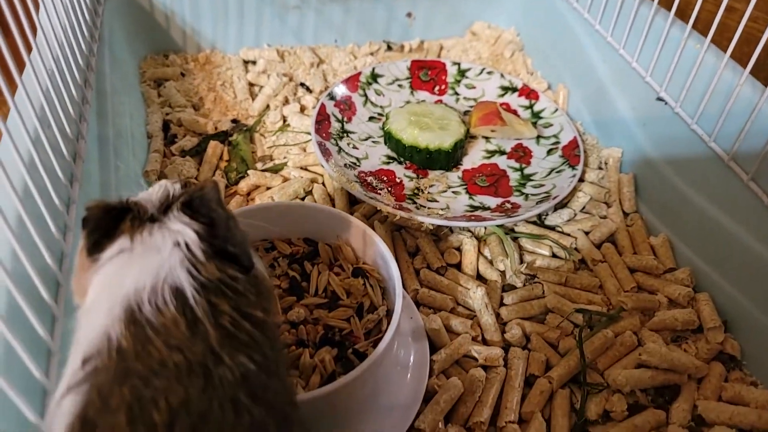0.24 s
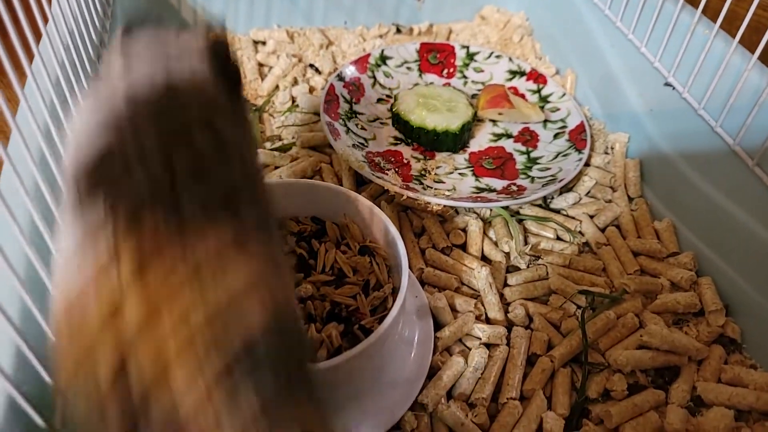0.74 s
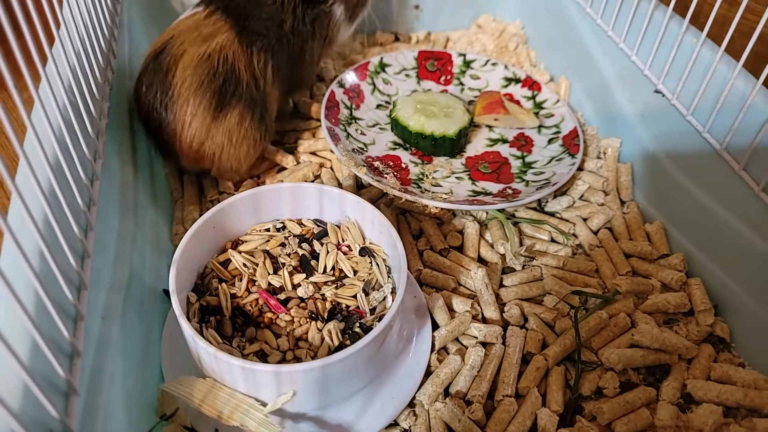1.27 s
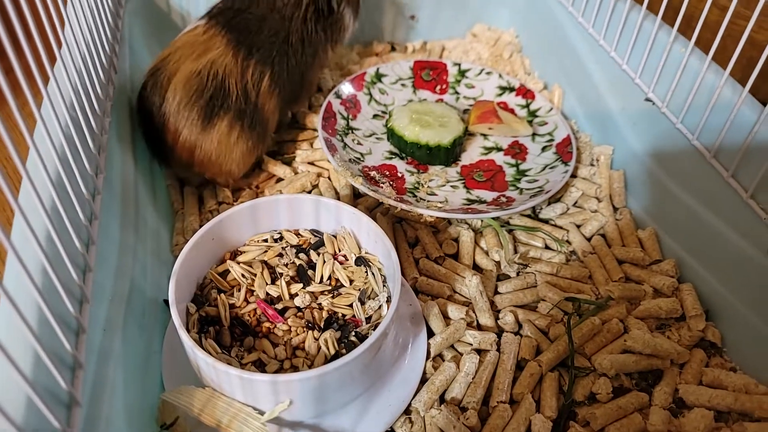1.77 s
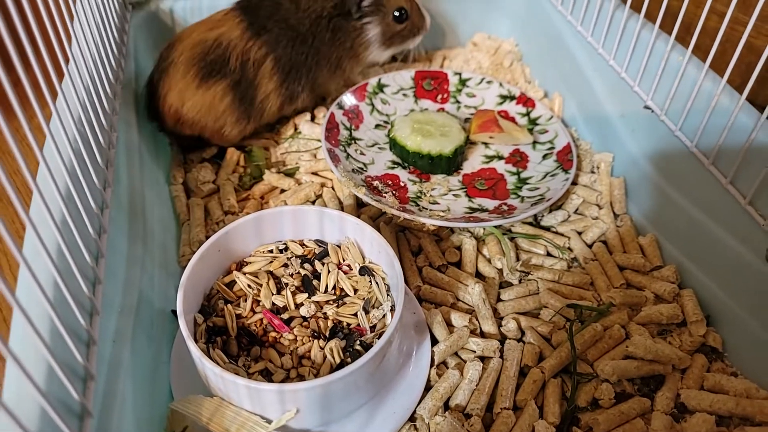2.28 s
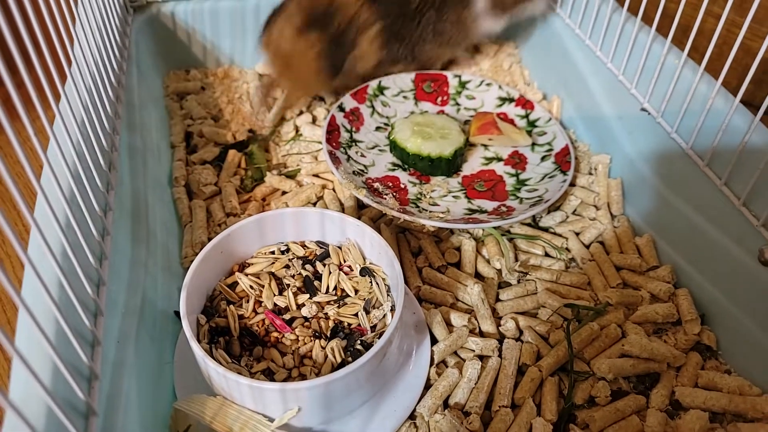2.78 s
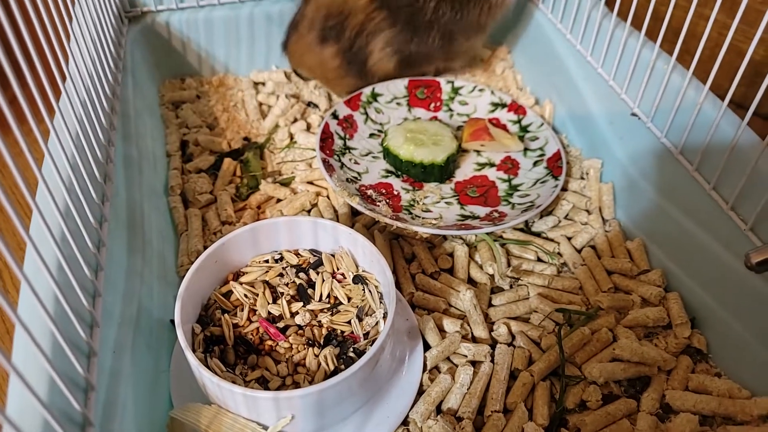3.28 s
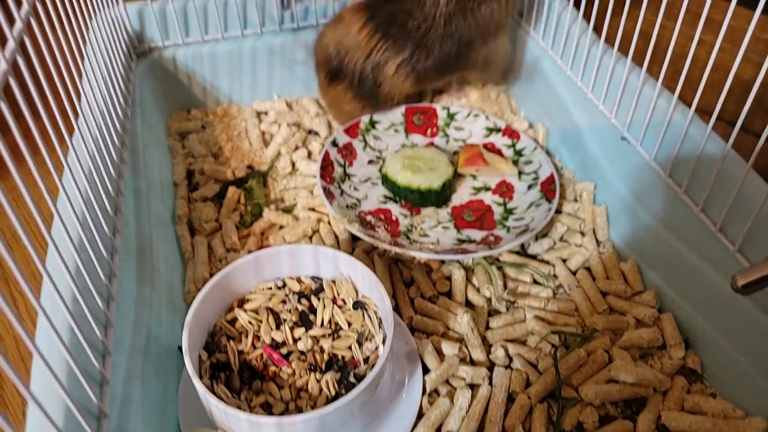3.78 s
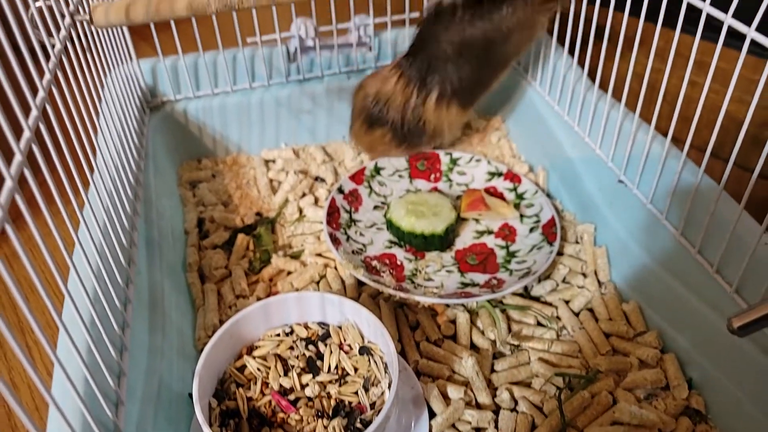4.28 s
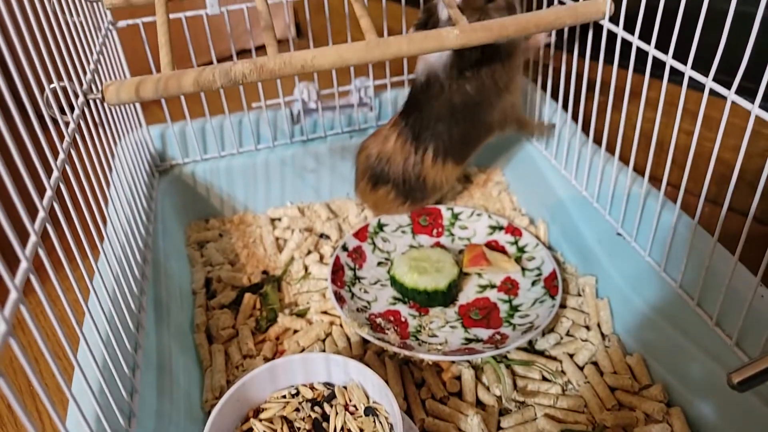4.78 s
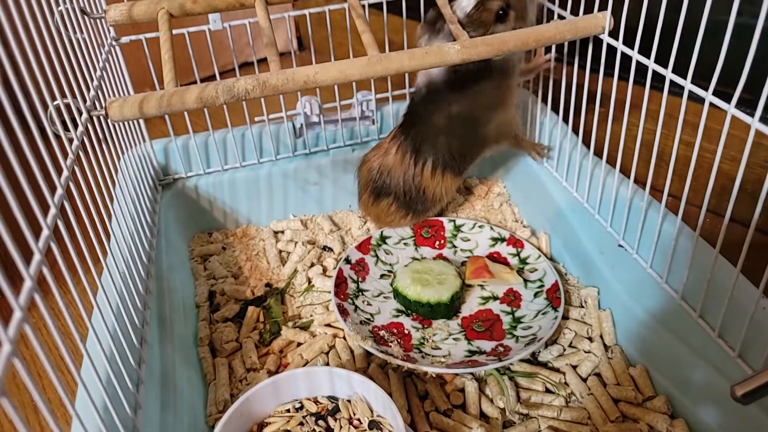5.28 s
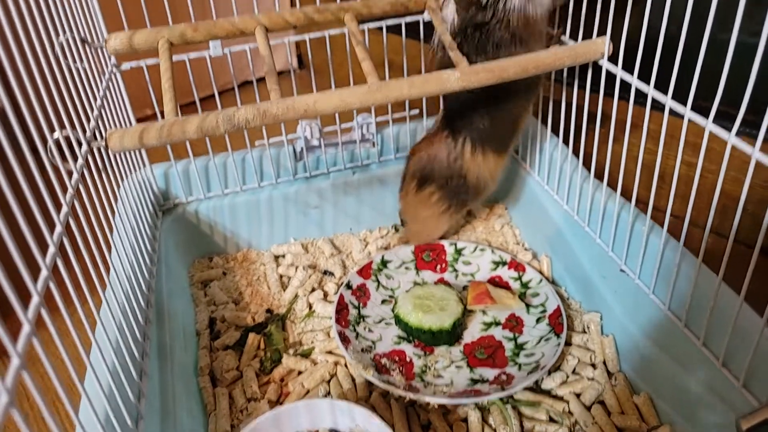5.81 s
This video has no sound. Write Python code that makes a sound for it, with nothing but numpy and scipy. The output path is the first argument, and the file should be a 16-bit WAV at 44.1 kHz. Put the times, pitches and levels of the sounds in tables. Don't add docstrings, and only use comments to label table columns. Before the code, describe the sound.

In a quiet room, a small rodent chirps short upturned squeaks, knocks a bowl sharply, thumps down on its tray, then scrabbles softly at wire bars.

```python
import sys
import numpy as np
from scipy import signal
from scipy.fft import rfft, irfft, next_fast_len
from scipy.io import wavfile

SR = 44100
rng = np.random.default_rng(int(sys.argv[2]) if len(sys.argv) > 2 else 0)


def dump(signal):
    limited = np.clip(np.atleast_2d(signal).T, -1, 1)
    pcm = np.round(limited * 32767).astype(np.int16)
    wavfile.write(sys.argv[1], SR, pcm)


def nominal_scale(level):
    x = np.asarray(level, float) / 20
    return 10 ** x


N = 266805


def squeaks():
    # start in s, length in s, held pitch in Hz, peak level in dB, share of the length at the peak (0-1).
    calls = [(0.972, .054, 783.7, -33, 0.6), (1.062, 0.017, 831, -40.5, 0.42),
             (1.17, 0.068, 736.6, -32.5, 0.44), (1.542, 0.062, 723.5, -35.5, 1),
             (2.111, 0.053, 709.7, -32, 0.38), (2.572, 0.033, 716, -40.5, 0.26),
             (2.758, 0.067, 723.7, -38, 0.4), (2.968, 0.056, 706.3, -41.5, 0.59),
             (3.317, 0.055, 724.4, -44, 0.49), (3.882, 0.0397, 714, -44, 0.35),
             (4.462, 0.04, 778, -50, 0.35), (4.916, 0.048, 740.5, -45, 0.4), (5.539, 0.047, 759, -45, 0.41),
             (0.464, 0.032, 789, -44.5, 1)]
    # start above held pitch in Hz, final flick in Hz, its time before the end in s,
    # drop of the fundamental there in dB.
    glides = [(196.5, 167, .012, 5.5), (25, 17.5, 0.0031, 5), (30.5, 168.5, 0.0083, 1),
              (-20, 115.5, 0.007, 10), (94.5, 258, 0.008, 4.5), (14.5, 195, .009, 1), (42.5, 167, .015, 9),
              (18, 97.5, 0.006, 5), (47.5, 226, 0.0089, 8), (332, 42, .003, 2), (-20.5, 21, 0.0045, 7),
              (103.5, 193, 0.0086, 16.5), (113, 190.5, .009, 18), (130, -150, .009, -3.5)]
    # middle after the start in s, half length in s.
    skips = [(0.019, 0.0051), (0.0092, 0.0065), (0.0129, 0.00773), (.021, 0.0098), (.012, .006),
             (0.0056, 0.0055), (0.015, 0.0035), (.005, .005), (0.015, 0.0074), (0.017, 0.017),
             (0.0097, 0.0073), (0.019, 0.0051), (0.029, 0.0042), (0.011, .003)]
    # left later in samples, overtones left-right in dB, overtones left later in samples.
    head = [(-3, -4, -10), (-1, -3, 4), (-2, -3, -1), (-1, -5, 0), (-2, 1, 2), (-2, 3, 4), (-4, 3, 15),
            (0, 2.5, 18), (-4, -3, 18), (-14, -3, -6), (-4, -5, -4), (-4, -2.5, -2), (-7, 2, -2),
            (-10, 2, -12)]
    # skipped-cycle line in dB, 2nd harmonic in dB,
    # 3rd harmonic in dB, lines half-way between harmonics in dB.
    colour = [(-40, -14, -25.5, -41.5), (-15.5, -16, -17.5, -37), (-14.5, -13, -45, -39.5),
              (-18, -16, -40, -39.5), (-26, -15, -45.5, -51), (-19.5, -14.5, -58, -37),
              (-34.5, -11, -29, -39), (-17.5, -12, -32, -39), (-13.5, -10, -34.5, -41),
              (-17.5, -8.5, -29, -25), (-25.5, -15.5, -47.5, -18), (-41, -10, -28.5, -38),
              (-38.5, -9, -22.5, -39.5), (-17, -12, -19, -34.5)]
    roughness = [.25, .25, .09, .3, .08, .24, .26, .1, .13, .32, .12, .13, .16, .12]
    harmonic_falls = [5.4, 4.9, 4, 6.1, 3.2, 5, 4.5, 7.1, 4, 11, 9, 12, 10, 6.4]
    # rise of effort to the peak in dB, sag after it in dB.
    effort = [(4.5, 6.5), (7, 10), (9, 8), (9, 8), (10.5, 7.5), (5, 4.5), (6.5, 8.5), (7, 2), (7.5, 5),
              (3, 6), (7.5, 4.5), (7, 8.5), (8.5, 7), (9.5, 1.5)]
    settle_share, flick_s, collapse_s = 0.29, 0.0041, 0.0015
    open_s, close_s, overtone_growth, overtone_late_s = 0.0041, 0.0028, 1.5, 0.007
    wobble_share, skip_ratio, skip_rise_per_s = 0.03, 1.55, 5.2
    out = np.zeros((2, N))
    for call, glide, skip, turn, tone, rough, fall_db, (swell_db, sag_db) in zip(
            calls, glides, skips, head, colour, roughness, harmonic_falls, effort):
        s, length, held_hz, peak_db, crest = call
        start_hz, flick_hz, tail_s, loss_db = glide
        skip_s, half_s = skip
        late, over_db, over_late = turn
        skip_db, second_db, third_db, half_db = tone
        t = np.arange(0, length, 1 / SR)
        from_tail = t - length + tail_s

        crest = np.clip(crest, .1, .9)
        rise_db = swell_db * (1 - t / length / crest)
        decline_db = sag_db * (t / length - crest) / (1 - crest)
        effort_db = -np.maximum(rise_db, decline_db)
        broken_db = loss_db * .5 * (1 + np.tanh(from_tail / collapse_s))
        fundamental = nominal_scale(peak_db + effort_db - broken_db)
        bright = nominal_scale(overtone_growth * effort_db + peak_db - 0.44 * broken_db)
        bright *= np.clip(np.minimum(t, length - t) / overtone_late_s, 0, 1)

        noise = rng.standard_normal((4, int(.1 * SR)))[:, :len(t)]
        shimmer, jitter = 7 * filtered(noise[:2], 4, 450)
        hz = held_hz + start_hz * np.exp(-t / (settle_share * length))
        hz = hz + flick_hz * .5 * (1 + np.tanh(from_tail / flick_s))
        hz = hz * (1 + wobble_share * rough * 18 * filtered(noise[1, ::-1], 2, 70))
        skipping = np.exp(-((t - skip_s) / half_s) ** 4)
        unsteady = rough * (.4 + .6 * skipping)
        phase = 2 * np.pi * np.cumsum(hz) / SR + unsteady * jitter

        robbed = np.clip(0.87 * nominal_scale(skip_db + 12.5), 0, .8) * skipping
        voice = bright * nominal_scale(second_db) * (1 - robbed) * np.sin(2 * phase + 1)
        third, *upper = [bright * nominal_scale(third_db - fall_db * k) * np.sin((3 + k) * phase + k) for k in range(4)]
        voice += third
        voice += bright * nominal_scale(half_db) * (np.sin(1.5 * phase) + np.sin(2.5 * phase))
        airflow = rms_one(filtered(noise[3], 3, [1000, 2500], "band"))
        voice += rough * nominal_scale(20 * np.log10(fundamental) - 26) * airflow

        skip_hz = held_hz * (skip_ratio + skip_rise_per_s * (t - skip_s))
        skip_phase = 2 * np.pi * np.cumsum(skip_hz) / SR + 2 * rough * shimmer
        low = fundamental * (np.sin(phase) + nominal_scale(skip_db + 4.0) * skipping * np.sin(skip_phase))

        gate = np.clip(np.minimum(t / open_s, (length - t) / close_s), 0, 1)
        shape = np.sqrt(2) * (1 + shimmer * unsteady) * gate
        add(out, s, lagged(low * shape, 0, late))
        add(out, s, lagged(sum(upper) * shape, over_db, late))
        add(out, s, lagged(voice * shape, over_db, over_late))
    return out


def knocks():
    # start in s, peak level in dB, ring in Hz, crack level in dB, t60 in s.
    blows = [(.770, -53.5, 790, -82, 0.096), (0.7877, -32.5, 1286, -23.5, 0.022),
             (0.7878, -30, 2170, -67, .015), (.790, -30, 745, -38, 0.031), (0.875, -54, 1230, -36, 0.02),
             (0.88, -48, 1000, -44, .02), (.9148, -34.5, 610, -48, 0.02), (0.9207, -20, 1100, -27, 0.0065),
             (0.9198, -26, 2226, -29.5, 0.01), (.9211, -30, 560, -39, 0.022), (0.925, -35, 1000, -46, .011),
             (3.371, -59, 752, -78.5, 0.079), (4.007, -44.5, 760, -58.5, .012),
             (1.007, -44, 1100, -35, 0.029), (1.065, -44, 855, -47.5, 0.021),
             (3.989, -38, 1100, -51, 0.022), (4.003, -56, 478, -32.5, 0.016),
             (4.003, -40.5, 700, -60, 0.02), (4.019, -52, 690, -44, 0.019),
             (4.0451, -45.5, 2460, -34.5, 0.02), (4.0447, -47.5, 1570, -72, 0.0032),
             (4.208, -61.5, 1850, -62.5, 0.062), (4.227, -46.5, 602, -58, 0.018),
             (4.239, -49.5, 690, -66.5, 0.019), (3.797, -48.5, 1200, -65, .012),
             (3.8665, -51.5, 1140, -65, 0.019), (.9255, -35, 920, -42, .012), (0.9304, -35, 897, -52, .012),
             (4.355, -63.5, 1633, -70, 0.054), (4.256, -64.5, 567.5, -62, 0.46),
             (4.432, -60, 590, -72, 0.12)]
    # start in s, peak level in dB, ring in Hz.
    taps = [(.4985, -44, 1052), (2.687, -51.5, 755), (2.726, -46, 760), (2.728, -53.5, 1483),
            (2.28, -62, 894), (3.256, -67, 1313), (3.377, -54, 1100), (2.694, -54, 757),
            (5.431, -55.5, 710), (5.728, -60, 1764), (4.257, -51, 620), (4.285, -57, 650),
            (4.298, -54.5, 697), (4.433, -51, 592), (3.784, -60.5, 743), (3.981, -44.5, 715),
            (4.191, -52.5, 753), (4.2095, -48, 770), (4.239, -49, 1133), (4.317, -49.5, 589),
            (4.87, -65.5, 1857), (4.404, -52, 596), (4.42, -48, 600), (4.54, -51, 660), (4.876, -53.5, 720),
            (5.376, -65, 1042), (5.445, -53.5, 631), (5.517, -44.5, 689), (5.671, -56, 715),
            (5.722, -54.5, 730)]
    # ratio to the ring frequency, level in dB.
    plastic = [(1, 4), (0.32, -16.5), (0.88, -11), (1.4, -8), (4.1, -8.5)]
    tap_crack_db, tap_t60_s = -20, 0.022
    scatter_db, scatter_samples = 2.5, 9
    out = np.zeros((2, N))
    t = np.arange(int(.12 * SR)) / SR
    soft = [(s, db, hz, db + tap_crack_db, tap_t60_s) for s, db, hz in taps]
    for s, peak_db, hz, crack_db, t60 in [*blows, *soft]:
        hard = nominal_scale(.5 * (peak_db + 19.0))
        body = 0
        for ratio, db in plastic:
            level, detune, pan, lag = rng.standard_normal(4)
            mode_hz = hz * ratio * (1 + detune / 25 * (ratio != 1))
            gain = nominal_scale(db + 2.5 * level) * hard ** (.5 * max(ratio - 1, 0))
            mode = gain * ring(mode_hz, t60 / ratio ** .6, .0004 / hard)
            body = body + lagged(mode, scatter_db * pan, scatter_samples * lag)[:, :len(t)]
        noise = rng.standard_normal((3, len(t)))
        noise[0, :2] = 6 * hard ** .4
        top_hz = np.clip(2000 + 6000 * hard, 1500, 12000)
        crack = (noise[0] + 0.31 * noise[1:]) * nominal_scale(-60 * t / 0.017)
        crack = filtered(crack, 3, [900, top_hz], "band")
        add(out, s, sided(nominal_scale(peak_db + 8.5) * body + nominal_scale(crack_db + 3.0) * crack, s))
    return out


def ticks():
    # start in s, peak level in dB.
    touches = [(.4224, -68), (.7808, -55), (.7876, -26), (.849, -48), (.857, -49), (.863, -42), (.897, -39),
               (.9194, -15), (.9744, -47), (.9944, -58), (1.064, -52), (1.0926, -48), (2.2368, -64),
               (3.784, -56), (3.8666, -70), (3.894, -70), (4.2072, -64), (4.2381, -57), (4.4075, -63),
               (4.54, -68), (5.4979, -65), (5.7593, -61), (5.8194, -67)]
    out = np.zeros((2, N))
    t = np.arange(int(.12 * SR)) / SR
    for s, peak_db in touches:
        pulse = rng.standard_normal((2, len(t))) * nominal_scale(-60 * t / .004)
        tick = resonance(np.diff(pulse), 9500, 7000)
        add(out, s, sided(nominal_scale(peak_db - 1.5) * tick, s))
    return out


def clacks():
    # start in s, peak level in dB, centre in Hz.
    strikes = [(0.7883, -26, 3000), (0.8004, -46, 5000), (2.727, -61.5, 1700), (3.7845, -60.5, 3500),
               (3.799, -61, 3500), (3.982, -51, 1800), (3.986, -49, 2000), (3.9908, -46.5, 3930),
               (4.0008, -44, 2400), (4.008, -42, 1500), (4.0217, -52, 4300), (4.0448, -43, 2780),
               (4.195, -63, 2500), (4.227, -58.5, 1900)]
    t60_s = .008
    out = np.zeros((2, N))
    t = np.arange(int(.12 * SR)) / SR
    for s, peak_db, hz in strikes:
        snap = rng.standard_normal(len(t)) + .5 * rng.standard_normal((2, len(t)))
        snap = snap * nominal_scale(-60 * t / t60_s)
        clack = resonance(resonance(snap, hz, 0.42 * hz), hz, 1.2 * hz)
        add(out, s, sided(nominal_scale(peak_db + 4.5) * clack, s))
    return out


def thuds():
    # start in s, peak level in dB, upper mode in Hz, t60 in s.
    landings = [(0.483, -67, 90, 0.059), (0.791, -60.5, 113, 0.12), (0.86, -60, 100, .08),
                (.92, -44, 132, 0.094), (0.957, -34, 145, 0.061), (0.99, -40.5, 138, 0.091),
                (1.156, -40.5, 140.5, 0.064), (1.189, -45, 160, 0.07), (1.222, -49.5, 125, 0.072),
                (1.293, -56, 153, 0.12), (1.425, -49, 154, 0.061), (3.992, -51.5, 171.6, 0.12),
                (4.004, -38.5, 180, 0.019), (4.077, -50.5, 172, 0.028), (5.726, -60, 143.3, 0.15),
                (5.766, -55.5, 150.7, 0.084)]
    out = np.zeros((2, N))
    for s, peak_db, hz, t60 in landings:
        boom = ring(hz, t60, 0.0022) + nominal_scale(-11.0) * ring(0.69 * hz, 1.4 * t60, 0.0036)
        add(out, s, nominal_scale(peak_db + 6.5) * np.array([nominal_scale(-2.0) * boom, np.roll(boom, 14)]))
    return out


def scrabble():
    # loudest moment in s, pellets shifting in dB, fur and claws brushing in dB, swell in s, die in s.
    shuffles = [(.002, -85, -72, 0.016, 0.13), (.48, -60, -67, 0.028, 0.13), (.524, -89, -87, 0.034, 0.47),
                (.793, -55, -56.5, 0.041, 0.23), (.9, -56, -53, 0.12, 0.019),
                (.97, -52.5, -54.5, 0.057, 0.18), (1.1, -66, -68.5, 0.26, 0.27),
                (2.24, -86, -80, 0.17, 0.2), (2.586, -84.5, -77, 0.067, 0.08),
                (3.785, -100, -77, .02, 0.42), (3.898, -75.5, -82.5, 0.18, 0.11),
                (3.98, -71, -67.5, 0.017, 0.11), (4.01, -60.5, -80, 0.072, 0.23),
                (4.206, -64, -80.5, 0.013, 0.04), (4.238, -60.5, -66, 0.0045, 0.11),
                (4.4, -75, -75, 0.084, 0.087), (4.45, -80, -85, 0.19, 0.095), (4.54, -78, -83, 0.13, 0.14),
                (4.84, -90, -83.5, 0.14, 0.64), (5.03, -79.5, -88, 0.25, .1),
                (5.376, -83, -93, 0.036, 0.63), (5.51, -92.5, -80, 0.29, 0.075),
                (5.724, -76, -81, 0.033, 0.21)]
    # loudest moment in s, level in dB, swell in s, die in s.
    tray_rumble = [
        (1.0, -63.5, 0.24, 2.6),
        (4.05, -65.5, 0.55, 0.72),
        (5.75, -72.5, 0.55, 0.47),
    ]
    # frequency in Hz, level in dB per Hz.
    pellet_spectrum = [(180, -37.5), (300, 0), (554, 4.5), (1150, 1), (1610, 2.5), (2070, -5), (3630, -22),
                       (6000, -27), (7800, -44), (13200, -120)]
    # frequency in Hz, level in dB per Hz.
    brush_spectrum = [(1470, -36), (2500, -18), (6550, -13.5), (8140, -6), (9510, -17), (14700, -18.5),
                      (16000, -22)]
    # centre in Hz, width in Hz, level in dB.
    bar_bands = [(3350, 450, -3), (5400, 800, 0), (8200, 800, -5), (11400, 800, -8), (13900, 800, -9)]
    bars_reached_s, bars_left_s = 4.15, 4.94
    shifting, brushing = bursts(shuffles)
    pellets = coloured(grains(5000, 3), pellet_spectrum, [(300, .8), (3000, .3)], 1.5)
    brush = coloured(grains(21000, 1.3), brush_spectrum, [(3000, 0.2), (9000, 0.0029)], 1.2)

    claws = grains(12000, 1.7)[0]
    bars = 0
    for hz, width, level_db in bar_bands:
        band = resonance(resonance(claws, hz, width), hz, 2 * width)
        bars = bars + nominal_scale(level_db + 2.9 * drift(23.3)) * band
    bars = rms_one(bars)
    t = np.arange(N) / SR
    climbing = (t > bars_reached_s) & (t < bars_left_s)
    brush = np.where(climbing, 1.57 * bars + 0.47 * brush, brush * nominal_scale([[1.5], [-1.5]]))
    brushing = brushing * nominal_scale(1.5 * drift(35))

    rumble = rng.standard_normal(N) + 0.52 * rng.standard_normal((2, N))
    rumble = rms_one(resonance(resonance(rumble, 91, 140), 180, 200))
    return nominal_scale(6.0) * shifting * pellets + nominal_scale(-4.5) * brushing * brush + bursts(tray_rumble) * rumble


def pluck():
    # mode in Hz, level in dB, t60 in s.
    bar_modes = [(2293, -10, 0.4), (4651, -3, 0.17), (6998, 0, 0.077), (9496, -8, 0.17), (12230, -13, 0.13),
                 (12480, -11, 0.066), (15290, -11, 0.053)]
    pluck_s, pluck_db, gripped_s = 3.9625, -57, 0.065
    out = np.zeros((2, N))
    wire = sum(nominal_scale(pluck_db + db) * ring(hz, t60, 0.00058) for hz, db, t60 in bar_modes)
    wire *= nominal_scale(-900 * np.maximum(np.arange(len(wire)) / SR - gripped_s, 0))
    add(out, pluck_s, wire * nominal_scale([[-1], [1]]))
    return out


def room(x):
    wall_echo_s, wall_echo_db, wall_cut_hz = 0.016, -21, 2800
    room_t60_s, treble_t60_s, room_db, build_s, low_hz = 0.65, 0.26, -44.5, 0.016, 1000
    cage_t60_s, cage_db = .1, -34
    scatter_per_s, steady_share = 130, 0.3
    t, size = np.arange(SR) / SR, next_fast_len(N + SR)
    noise = rng.standard_normal((2, SR))
    dull = filtered(noise, 1, wall_cut_hz)
    build = np.clip(t / build_s, 0, 1)
    tail = dull * nominal_scale(-60 * t / room_t60_s) + (noise - dull) * nominal_scale(-60 * t / treble_t60_s)
    tail = nominal_scale(room_db) * filtered(tail * build ** 2, 2, low_hz, "high")
    tail += nominal_scale(cage_db - 60 * t / cage_t60_s) * dull[::-1] * build
    echo = np.zeros((2, SR))
    echo[[0, 1], (wall_echo_s * SR * np.array([1, 1.03])).astype(int)] += nominal_scale(wall_echo_db)
    echo = filtered(echo + 1e-18, 1, wall_cut_hz)
    scattered = x * (steady_share + drift(scatter_per_s))
    wet = rfft(tail, size) * rfft(scattered, size) + rfft(echo, size) * rfft(x, size)
    return irfft(wet, size)[:, :N]


def background():
    # frequency in Hz, level in dB per Hz.
    quiet = [(15, -49), (25, -20), (114, -11.5), (265, -13), (296, -8), (448, -20.5), (530, -2.5),
             (615, -14.5), (715, 1.5), (785, -9.5), (912, -16.5), (1210, -27), (2200, -35.5), (2860, -64),
             (4840, -120)]
    # frequency in Hz, left-right likeness (clipped to -1..1).
    likeness_curve = [(60, 0.92), (240, 0.95), (950, -0.41), (3770, -1.1), (15000, 0.19)]
    # frequency in Hz, level in dB per Hz.
    hiss_spectrum = [(1300, -2.5), (2200, -0.5), (3500, -4), (6000, -5.5), (9000, -4.5), (13000, -2),
                     (16500, -3)]
    # centre in Hz, width in Hz, level in dB.
    motor_lines = [(128, 1.2, -80.5), (184.7, 4.2, -84), (301.7, 21, -78.5), (357.8, 6.1, -78.5),
                   (525, 19, -79.5), (556, 1.9, -81.5), (730.6, 4.6, -74), (918, 6, -82), (2800, 18, -101)]
    quiet_db, hiss_db = -65.5, -89.5
    air = nominal_scale(quiet_db - 2.5) * coloured(rng.standard_normal((2, 2, N)), quiet, likeness_curve, 0.58)
    hiss = coloured(rng.standard_normal((2, 2, N)), hiss_spectrum, [(1000, 0), (9000, 0)], .3)
    white = rng.standard_normal((3, N))
    motor = white[0] + .5 * white[1:]
    hum = sum(nominal_scale(db) * rms_one(resonance(resonance(motor, hz, w), hz, w)) for hz, w, db in motor_lines)
    return air + nominal_scale(hiss_db + 3) * hiss + hum


def sided(x, s):
    # time in s, bright part left-right in dB, body left-right in dB, left later in samples.
    contact_side = [(.47, 12, 1, -17), (0.791, 12, -2, -12), (0.92, 4, 4.5, -10.5), (1.06, 8, -3.5, -1),
                    (2.72, 3, -1, 0.5), (3.9, 2.5, 1.5, -5), (4.02, 0.5, 2, -2.5), (4.21, 7, -0.5, -9.5),
                    (4.24, 2, 4, 4.5), (5.5, 0, 1, -1), (6, -5, 1, 4)]
    times, *columns = np.transpose(contact_side)
    bright_db, body_db, late = [np.interp(s, times, c) for c in columns]
    bass = signal.lfilter([.4], [1, -.6], x)
    return lagged(bass, body_db, late) + lagged(x - bass, bright_db, late)


def lagged(x, pan_db, late):
    late = round(np.clip(late, -30, 30))
    x = np.broadcast_to(x, (2, x.shape[-1])) * nominal_scale(pan_db * np.array([[.5], [-.5]]))
    delays = [max(late, 0), max(-late, 0)]
    return np.array([np.pad(side, (d, 30 - d)) for d, side in zip(delays, x)])


def ring(hz, t60, rise_s):
    t = np.arange(int(.12 * SR)) / SR
    return np.sin(2 * np.pi * hz * t) * nominal_scale(-60 * t / t60) * (1 - np.exp(-t / rise_s))


def resonance(x, hz, width_hz):
    r = np.exp(-np.pi * width_hz / SR)
    return signal.lfilter([1 - r, 0, r - 1], [1, -2 * r * np.cos(2 * np.pi * hz / SR), r * r], x)


def grains(per_s, spread_db):
    shape = (2, 2, N)
    touching = rng.random(shape) < per_s / SR
    size = nominal_scale(spread_db * np.minimum(rng.exponential(1, shape), 4))
    return touching * size * rng.standard_normal(shape)


def bursts(rows):
    t, gain = np.arange(N) / SR, 0
    for s, *level_db, swell_s, die_s in rows:
        away = np.maximum((s - t) / swell_s, (t - s) / die_s)
        gain = gain + nominal_scale(np.array(level_db)[:, None]) * nominal_scale(-30 * away)
    return gain


def coloured(source, spectrum, likeness, patchy_db):
    out, edges = 0, 24 * 2 ** np.arange(0, 9.6, .5)
    for k, (low, high) in enumerate(zip(edges, edges[1:])):
        hz = np.sqrt(low * high)
        if spectrum[0][0] < hz < 1.2 * spectrum[-1][0]:
            mid, side = filtered(source[k % 2], 2, [low, high], "band")
            alike = np.clip(at_hz(likeness, hz), -1, 1)
            gain = nominal_scale(at_hz(spectrum, hz) + patchy_db * drift(38))
            out = out + gain * (np.sqrt(1 + alike) * mid + np.sqrt(1 - alike) * side * [[1], [-1]])
    return out / np.sqrt(np.mean(out ** 2, axis=1).mean())


def drift(rate):
    r = np.exp(-80 * np.pi * rate / SR)
    slow = signal.lfilter([1], [1, -2 * r, r * r], rng.standard_normal(N // 40 + 2002))[2000:]
    return np.interp(np.arange(N) / 40, np.arange(len(slow)), rms_one(slow))


def filtered(x, order, hz, kind="low"):
    return signal.sosfilt(signal.butter(order, hz, kind, fs=SR, output="sos"), x)


def rms_one(x):
    return x / np.sqrt(np.mean(x ** 2) + 1e-20)


def at_hz(points, hz):
    point_hz, value = np.transpose(points)
    return np.interp(np.log(hz), np.log(point_hz), value)


def add(track, at_s, sound):
    i = round(at_s * SR)
    track[..., i:i + sound.shape[-1]] += sound[..., :N - i]


def scene():
    # time in s, left-right in dB.
    place = [
        (0, 0),
        (1.2, 0),
        (3.4, .5),
        (3.9, 1),
        (4.5, -2),
        (5, -2),
        (5.6, -4),
    ]
    pan_db = np.interp(np.arange(N) / SR, *np.transpose(place))
    near = squeaks() * nominal_scale(pan_db * [[.5], [-.5]]) + knocks() + ticks() + clacks() + pluck()
    near = filtered(near + 1e-18, 3, 540, "high")
    return near + room(near.mean(axis=0)) + thuds() + scrabble() + background()


def low_pass(x):
    return signal.sosfilt(signal.butter(12, 16650, fs=SR, output="sos"), x)


def record(dry):
    band = signal.butter(3, 42, "high", fs=SR, output="sos")
    top = signal.cheby2(14, 50, 16600, fs=SR, output="sos")
    mix = signal.sosfilt(np.vstack([band, top]), dry)
    return low_pass(mix)


dry = scene()
out = record(dry)
dump(out)
```